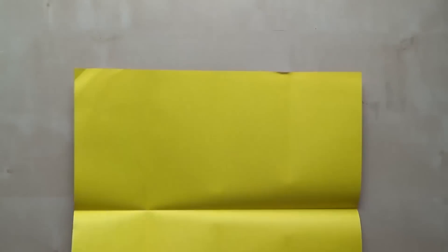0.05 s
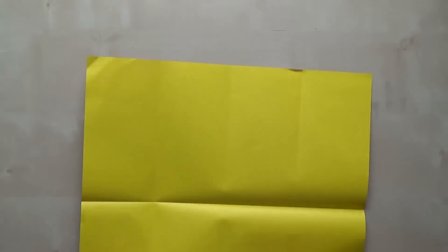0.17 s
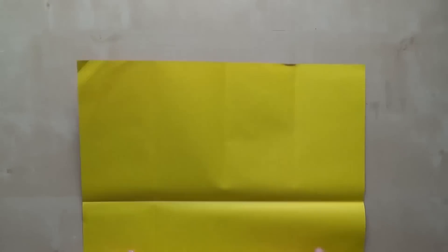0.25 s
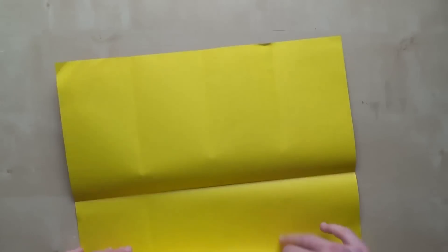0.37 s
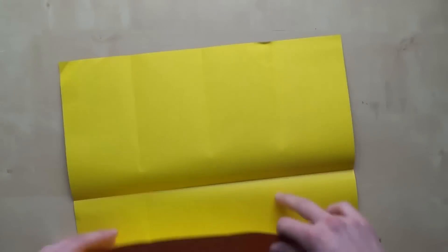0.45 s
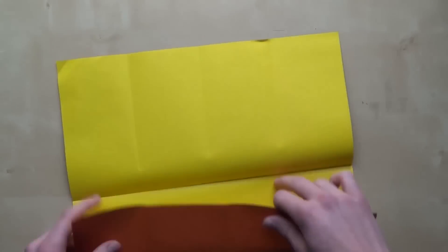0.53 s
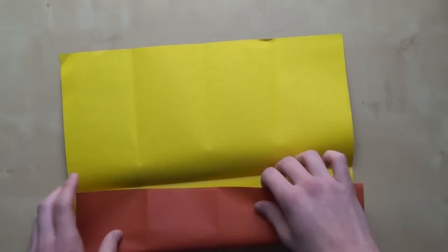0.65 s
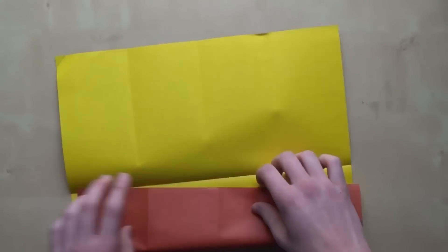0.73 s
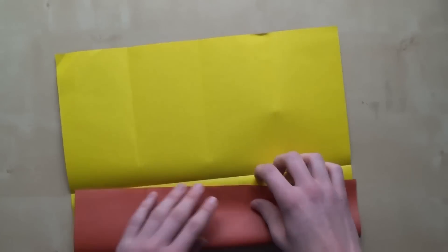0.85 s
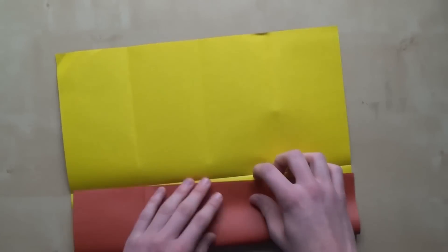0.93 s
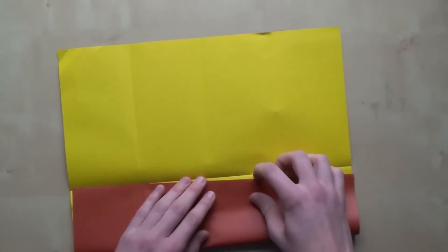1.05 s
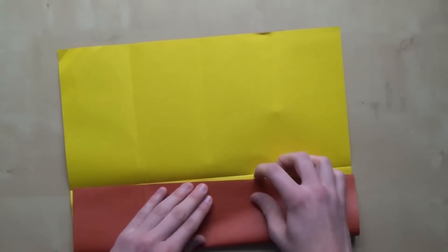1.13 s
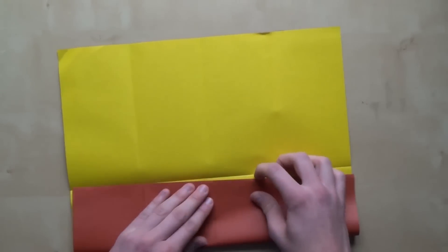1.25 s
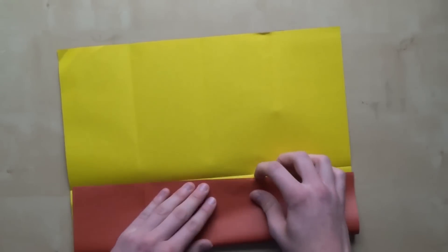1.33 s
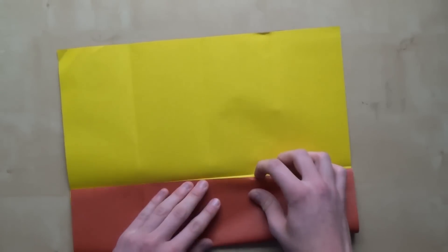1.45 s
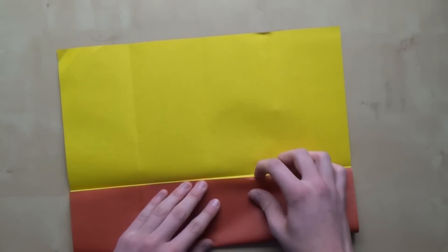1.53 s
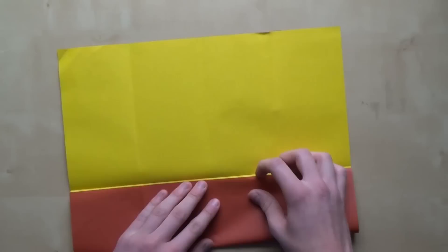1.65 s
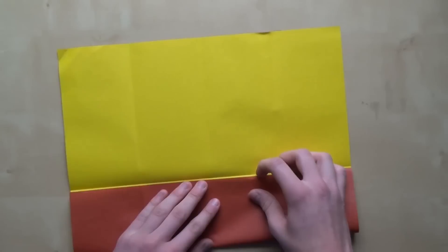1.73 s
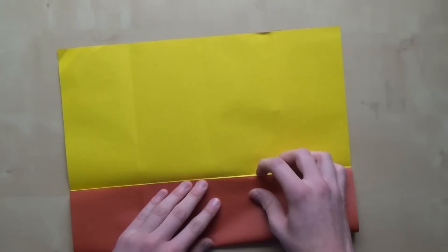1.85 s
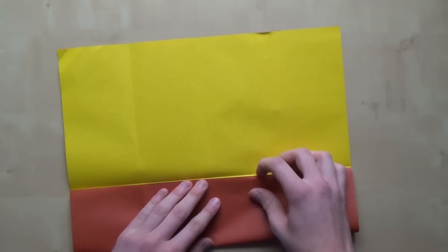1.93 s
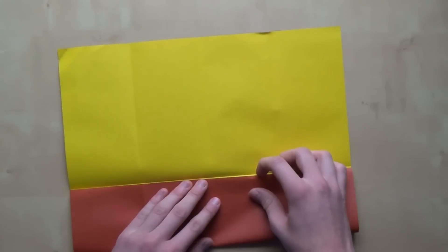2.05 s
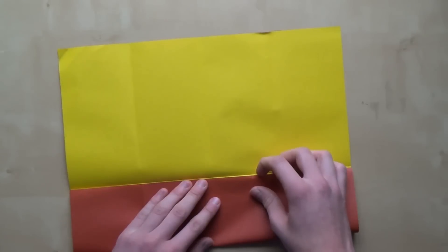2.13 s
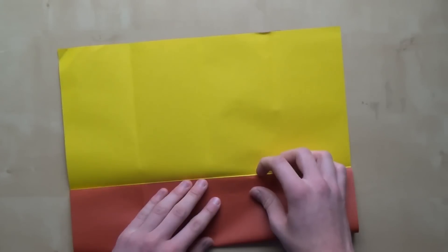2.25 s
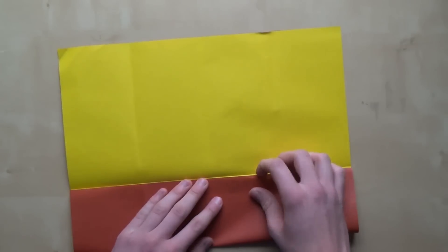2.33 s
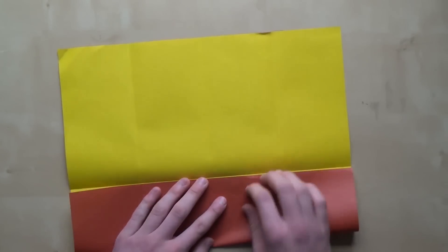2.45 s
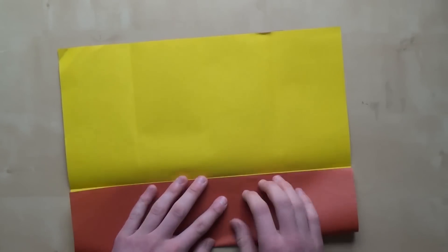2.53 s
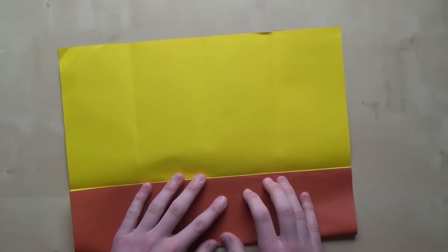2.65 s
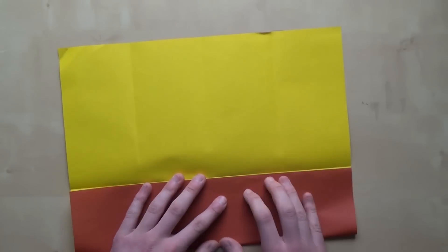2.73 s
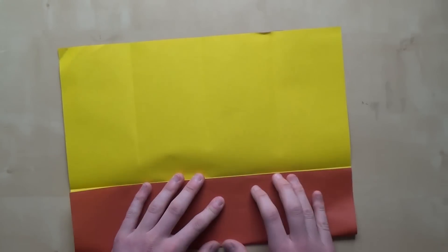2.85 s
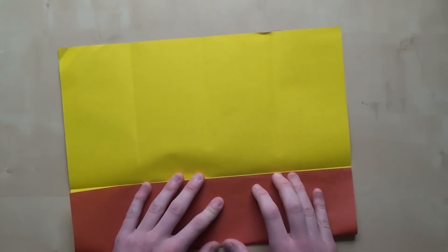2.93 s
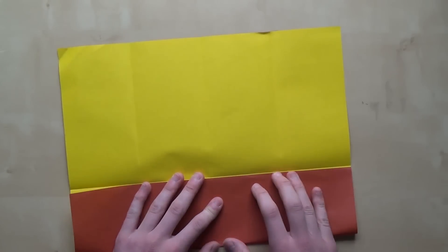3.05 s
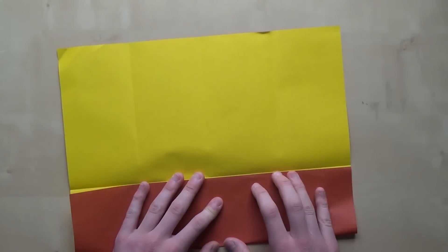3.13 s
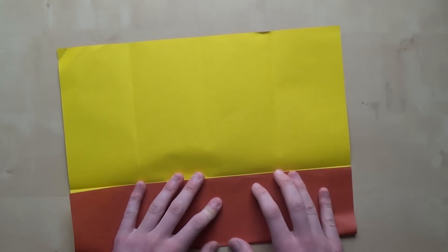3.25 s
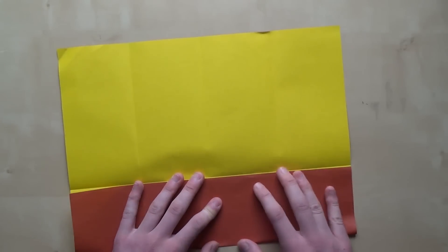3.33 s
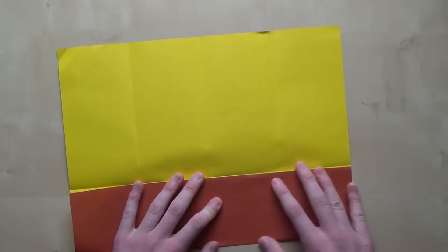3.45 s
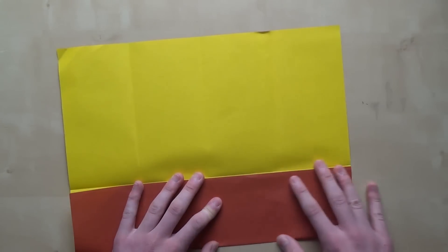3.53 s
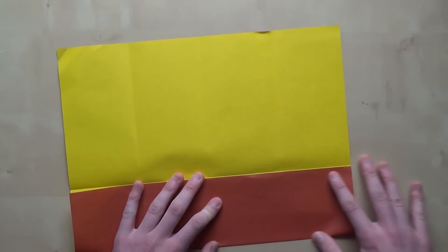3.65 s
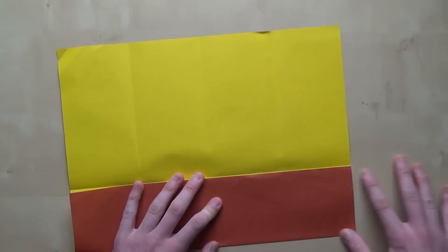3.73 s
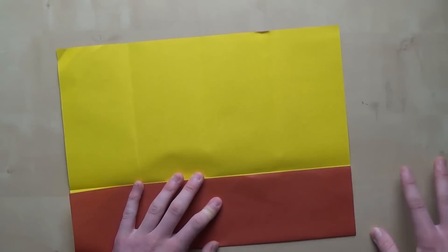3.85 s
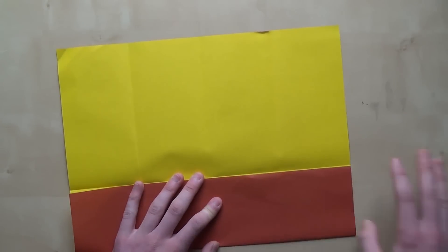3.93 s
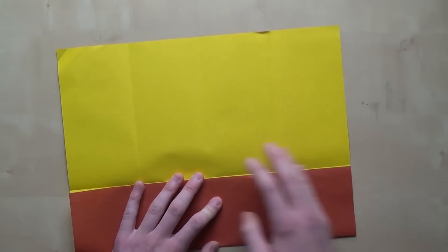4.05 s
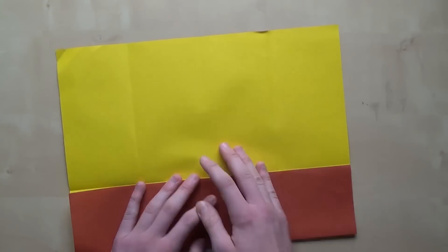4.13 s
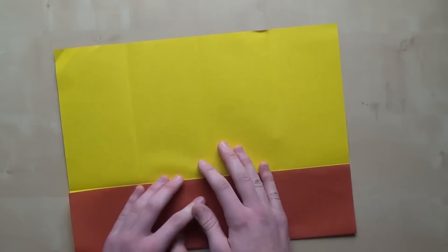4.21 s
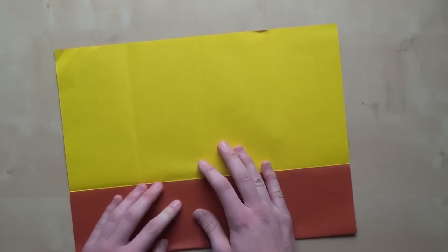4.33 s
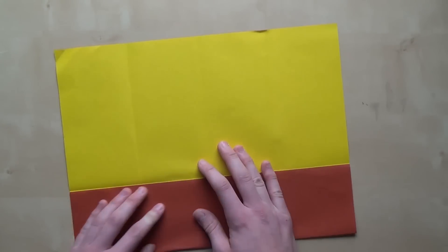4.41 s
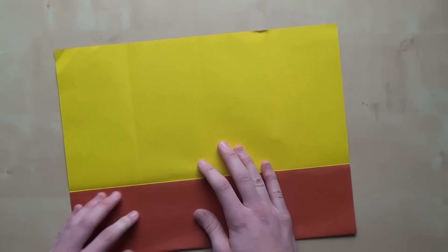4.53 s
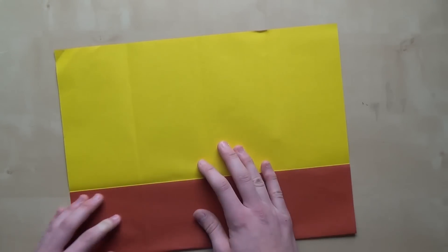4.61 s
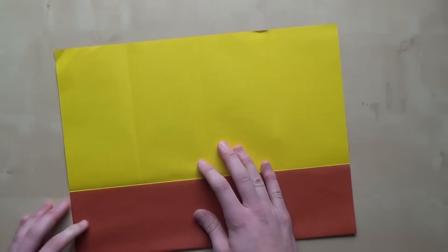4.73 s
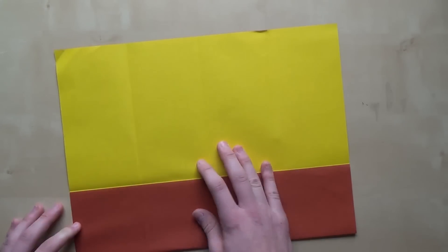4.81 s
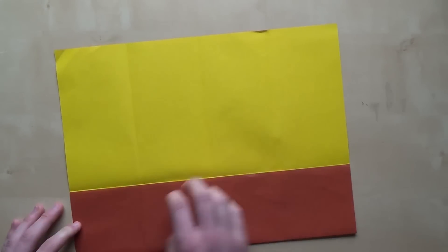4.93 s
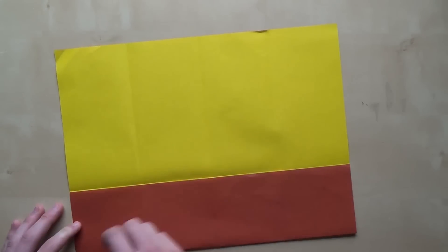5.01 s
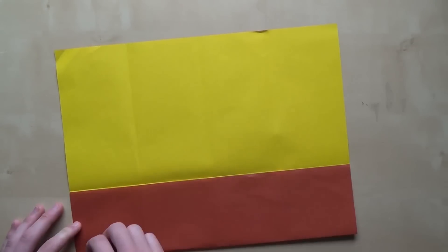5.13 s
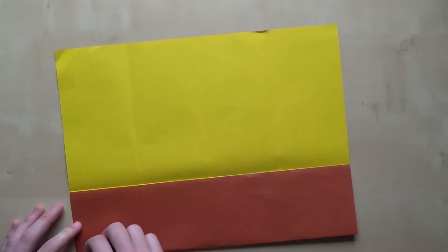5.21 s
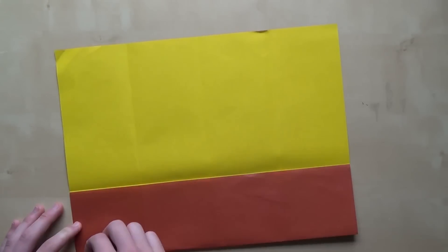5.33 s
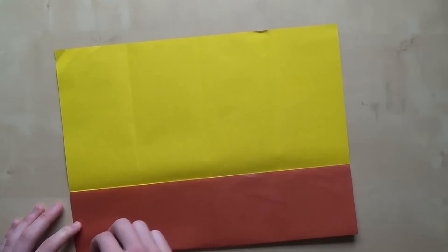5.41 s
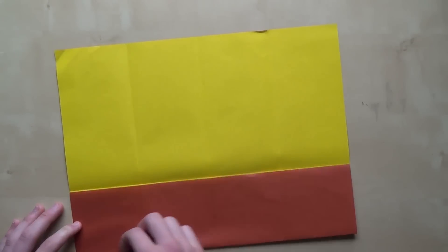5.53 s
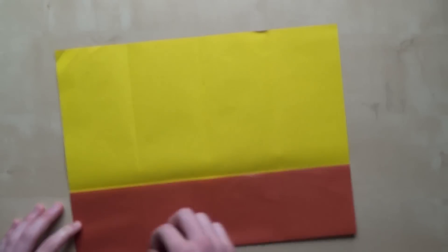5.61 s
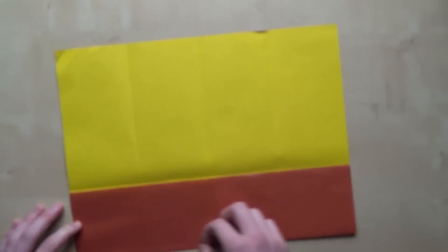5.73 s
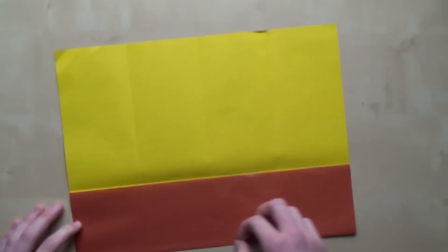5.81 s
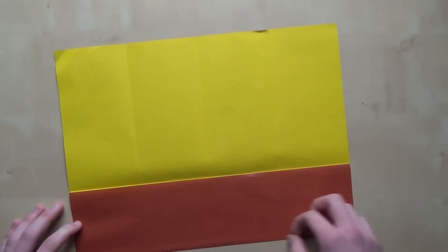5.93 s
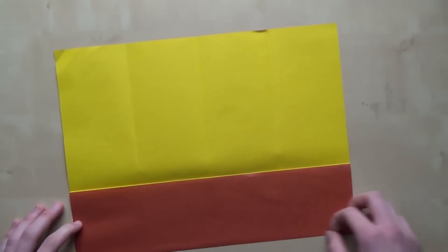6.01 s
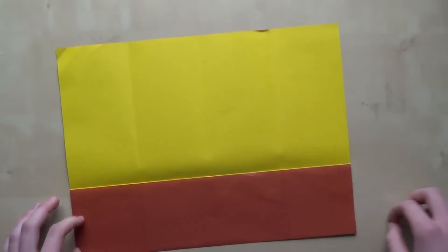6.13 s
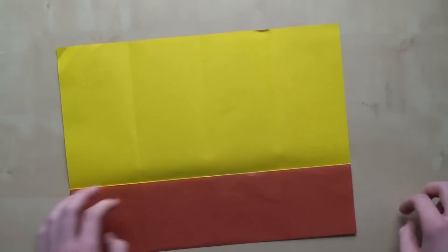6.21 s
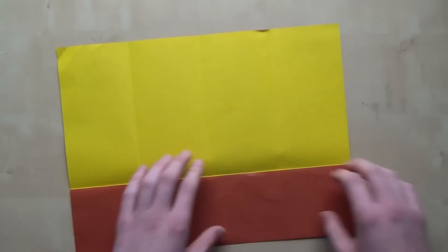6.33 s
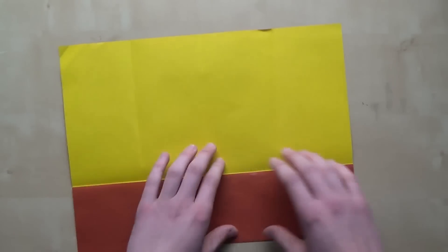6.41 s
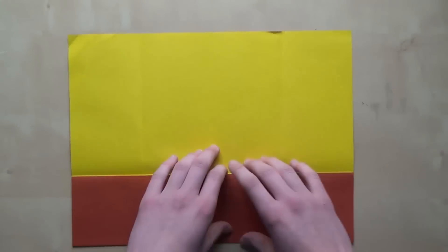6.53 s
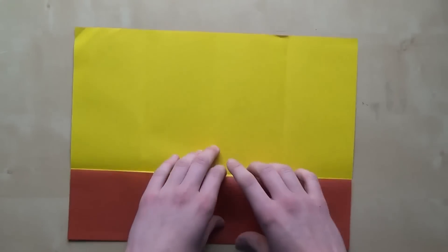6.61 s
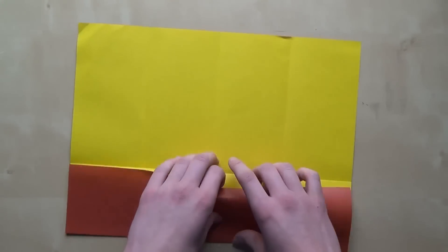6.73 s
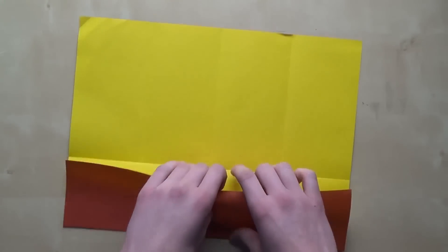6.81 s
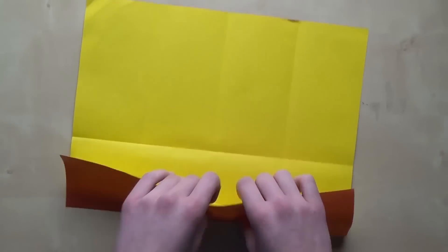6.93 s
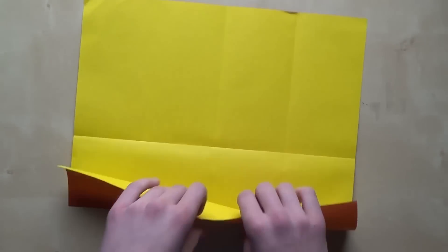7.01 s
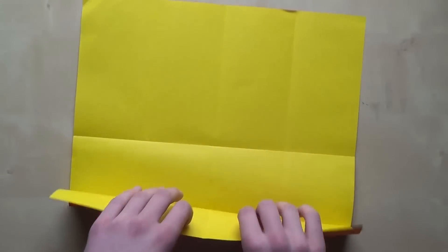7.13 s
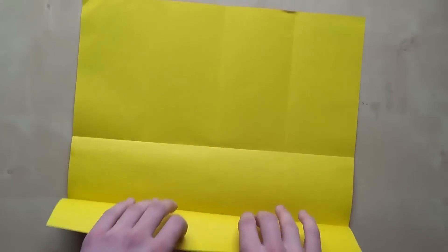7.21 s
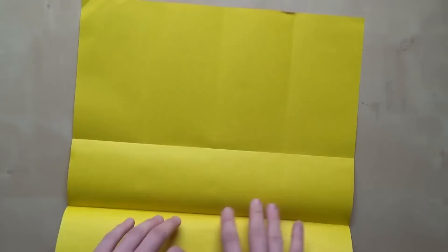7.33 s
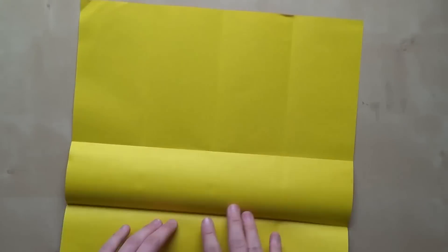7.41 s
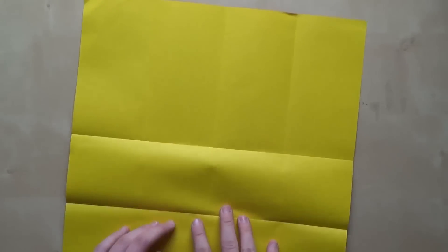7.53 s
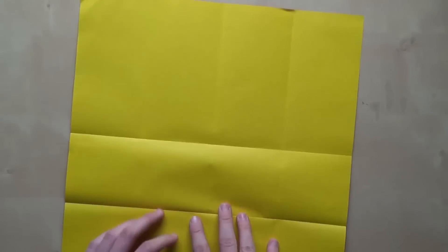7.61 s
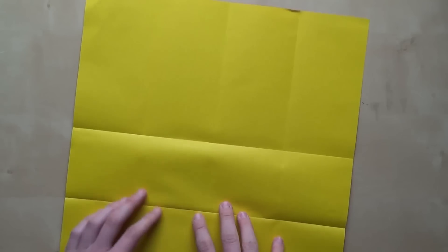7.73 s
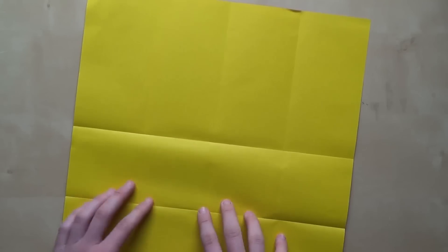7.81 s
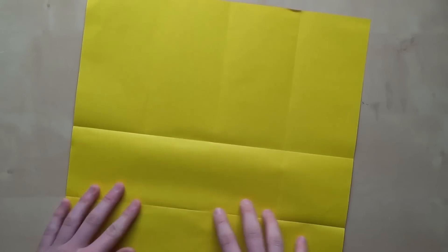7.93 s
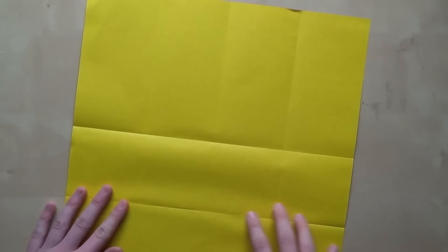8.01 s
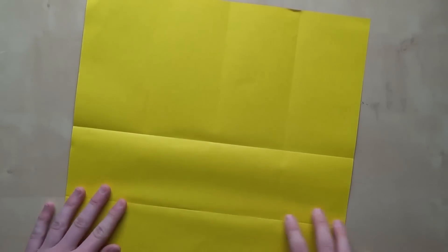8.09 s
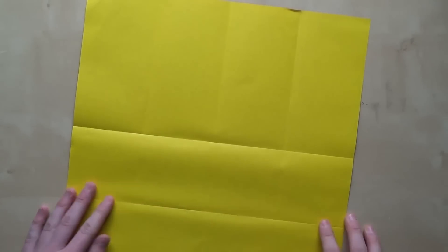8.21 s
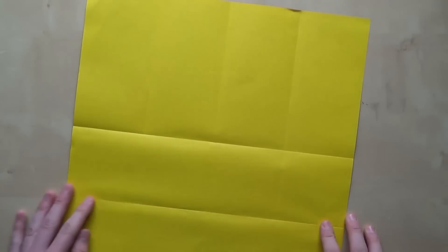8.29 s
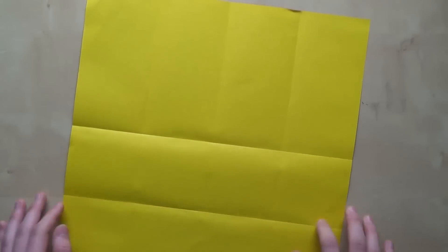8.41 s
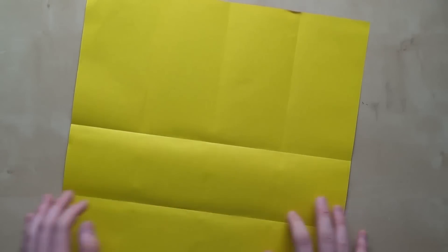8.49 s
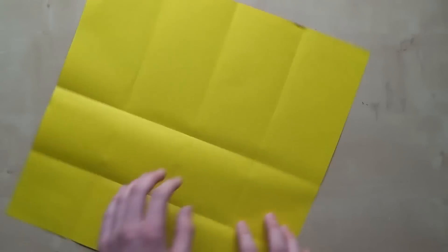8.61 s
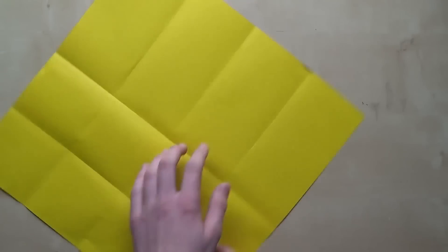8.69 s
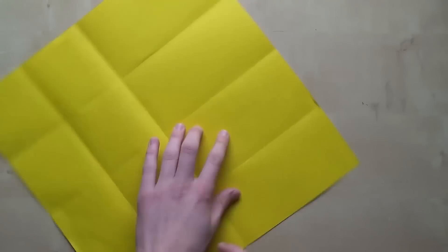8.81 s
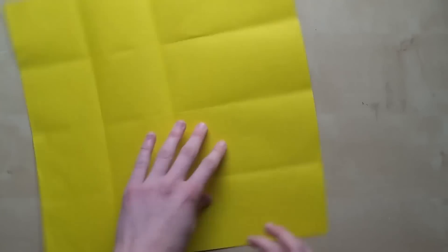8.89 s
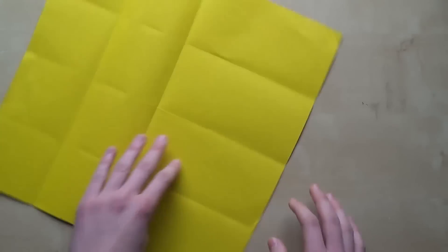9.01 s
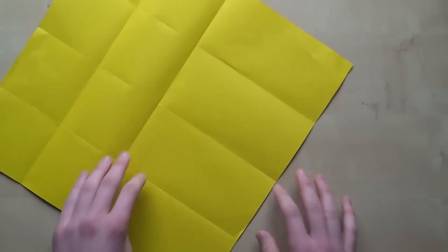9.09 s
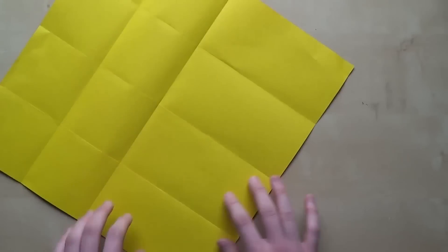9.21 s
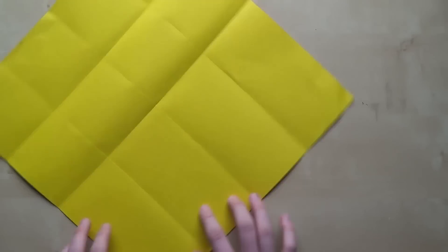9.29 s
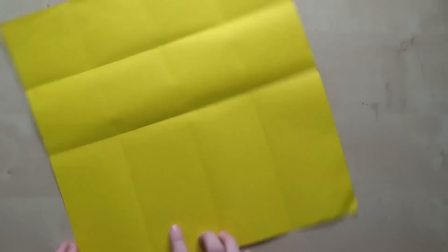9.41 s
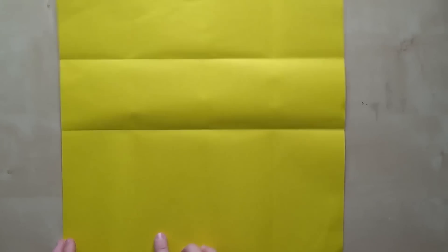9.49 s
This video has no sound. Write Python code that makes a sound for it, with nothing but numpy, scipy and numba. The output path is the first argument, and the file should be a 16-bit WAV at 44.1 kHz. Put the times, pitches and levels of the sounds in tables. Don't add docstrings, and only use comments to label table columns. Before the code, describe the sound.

Loud crumply rustling and dull paper pops come first, thinning to sparse hand rubs on a wooden table. Soft hissing strokes and a lower, woody nail scrape follow, ending in a sharp snap. The sheet crackles while unfolding, is brushed flat, then rustles strongly as it is swung around. Recorded near, with short room echoes, faint hum and slightly dulled treble.

```python
import sys
import numpy as np
from scipy import signal
from scipy.fft import rfft, irfft, next_fast_len
from scipy.io import wavfile
from scipy.ndimage import uniform_filter1d
from numba import njit

SR = 44100
rng = np.random.default_rng(int(sys.argv[2]) if len(sys.argv) > 2 else 0)


def natural_amplitude(level_db):
    exponent = np.asarray(level_db, float) / 20
    return 10 ** exponent


def transcribe(signal):
    frames = np.atleast_2d(signal).T
    limited = np.clip(frames, -1, 1)
    pcm = np.round(limited * 32767).astype(np.int16)
    wavfile.write(sys.argv[1], SR, pcm)


N = 421155
TIME = np.arange(N) / SR


def unit(x):
    return x / np.sqrt(np.mean(x ** 2))


@njit
def resonate(x, hz, width):
    y, band, low = np.empty(len(x)), 0., 0.
    for i in range(len(x)):
        g, damping = np.tan(np.pi * hz[i] / SR), width / hz[i]
        v = (band + g * (x[i] - low)) / (1 + g * (g + damping))
        band, low = 2 * v - band, low + 2 * g * v
        y[i] = damping * v
    return y


def ring(x, hz, width):
    return unit(resonate(x, np.full(len(x), 1. * hz), 1. * width))


def walk(rate):
    hold = int(SR / rate)
    steps = np.repeat(rng.standard_normal(N // hold + 1), hold)
    return 1.84 * uniform_filter1d(uniform_filter1d(steps, hold), hold)[:N]


def colour(x, response):
    hz, db = np.transpose(response)
    size = next_fast_len(len(x))
    bins = np.arange(size // 2 + 1) * SR / size + 1
    gain = natural_amplitude(np.interp(np.log(bins), np.log(hz), db))
    return irfft(rfft(x, size) * gain, size)[:len(x)]


def hum():
    # time in seconds, level in dB
    levels = [(0.0, -59), (1.09, -67), (1.91, -61), (4.71, -53), (5.56, -55.5), (5.95, -63), (6.33, -56),
              (7.34, -64.5), (8.7, -61), (8.9, -54), (9.55, -55)]
    phase = 2 * np.pi * np.cumsum(90.8 + 1.3 * walk(8.8)) / SR
    level_db = np.interp(TIME, *np.transpose(levels)) + 0.28 * walk(13)
    return np.sqrt(2) * natural_amplitude(level_db) * np.sin(phase)


def room_air():
    # frequency in Hz, level in dB
    spectrum = [(20, -14), (50, -5), (75, 3), (120, 3.5), (170, -2.5), (550, -2), (2500, -6.5),
                (11500, -18)]
    return unit(colour(rng.standard_normal(N), spectrum)) * natural_amplitude(-53.5 + 0.87 * walk(6.6))


def hands():
    # peak in seconds, rise in seconds, fall in seconds, peak in dB,
    # slide in dB (+ gliding, - bending)
    lifting = [(.028, 0.33, 0.0052, -34.5, 25), (.043, 0.0018, 0.022, -21, -2),
               (.075, 0.047, 0.095, -29, -13), (.11, 0.054, 0.079, -32.5, -8)]
    pressing = [(4.236, 0.023, 0.1, -38, -1), (4.325, 0.021, 0.097, -41, 5), (4.38, 0.067, 0.073, -54, 17),
                (4.43, 0.2, 0.56, -44.5, 10.5), (4.62, 0.21, 0.36, -50, 6), (4.8, 0.35, 0.14, -54, 15.5),
                (4.87, 0.47, 0.074, -56.5, -20), (5.15, 0.0048, 0.077, -48, 8.5),
                (9.27, 0.089, 0.11, -51, -18)]
    folding = [(.145, 0.0099, 0.29, -27.5, -4), (.242, 0.076, 0.079, -28, 2), (.3, 0.0076, 0.069, -32, -20),
               (.377, .004, 0.062, -21.5, 5), (.397, 0.035, 0.064, -17, 4), (.44, 0.13, 0.034, -19.5, 2),
               (.49, .05, 0.36, -37, 12.5), (.6, 0.34, 0.092, -36, -22), (.64, 0.032, 0.065, -34, 10),
               (.7, .04, 0.24, -26.5, 2.5), (.762, 0.17, 0.1, -28.5, -6), (.845, 0.053, 0.033, -23, 3),
               (.9, 0.066, 0.22, -33, 10.5), (1.0, 0.18, 0.27, -36.5, 4), (1.082, 0.023, 0.061, -29, 1),
               (1.19, 0.13, 0.19, -40.5, 8), (1.36, 0.053, 0.22, -46.5, 3), (1.435, 0.065, 0.12, -39, 8.5),
               (1.49, 0.074, 0.07, -40, -5), (1.575, 0.025, 0.13, -44.5, -3), (1.66, 0.0054, .04, -57, 1),
               (1.69, 0.047, 0.31, -52, 6.5), (1.95, .3, 0.65, -77, 6)]
    creasing = [(2.478, 0.027, 0.27, -42, -1), (2.686, 0.26, 0.13, -40, 2.5), (2.79, 0.012, 0.13, -48, -3),
                (2.9, 0.09, 0.13, -45, 2), (3.08, .2, 0.079, -54.5, -5.5), (3.2, 0.036, 0.15, -50.5, -2.5),
                (3.37, 0.031, 0.62, -46, 0.5), (3.52, 0.12, 0.28, -40.5, 3), (3.61, 0.046, 0.24, -37.5, 4),
                (3.72, 0.14, 0.15, -48.5, 11), (3.775, 0.0035, 0.16, -36.5, 2),
                (3.85, 0.11, 0.13, -51, 7.5), (3.95, 0.21, 0.19, -57.5, -34)]
    nailing = [(5.212, 0.059, 0.044, -52, 9), (5.3, 0.05, 0.34, -63, 5), (5.55, 0.074, 0.26, -54.5, 6),
               (5.63, 0.14, 0.7, -42.5, 5), (5.72, 0.15, 0.55, -38.5, 1.5), (5.84, 0.11, 0.47, -46, 4),
               (5.974, 0.46, 0.22, -37, 1.5), (6.12, 0.41, 0.28, -40.5, 2.5), (6.19, 0.36, 0.018, -39.5, 2),
               (6.215, 0.01, .11, -28.5, 4.5)]
    unfolding = [(6.525, 0.025, 0.089, -42.5, 4), (6.65, 0.12, 0.21, -44.5, 8.5),
                 (6.76, 0.11, 0.17, -46.5, -3), (6.85, 0.14, 0.14, -43, 8.5),
                 (6.89, 0.041, 0.099, -31.5, -7), (7.005, 0.09, 0.11, -27.5, 4.5),
                 (7.03, 0.025, 0.36, -39, -20), (7.195, 0.29, 0.083, -35.5, 0.5),
                 (7.26, 0.11, 0.19, -41.5, -3), (7.31, 0.0057, 0.061, -41, -19), (7.46, 0.023, 0.2, -43, 9),
                 (7.63, 0.15, 0.033, -33, -9), (7.647, 0.0059, 0.12, -29.5, 1),
                 (7.56, 0.043, 0.11, -36.5, -7)]
    smoothing = [(7.79, 0.058, 0.15, -39, 1), (7.845, 0.04, 0.1, -41, -3), (8.074, 0.22, 0.6, -44.5, 7),
                 (8.25, 0.53, 0.17, -43, 9), (8.42, 0.22, 0.18, -53, 12.5), (8.58, 0.42, 0.21, -55.5, -39),
                 (8.542, 0.024, 0.022, -34, 3)]
    turning = [(8.637, 0.0035, 0.13, -32.5, -13), (8.68, 0.047, 0.17, -32, 11.5),
               (8.75, 0.085, 0.091, -26.5, 7.5), (8.812, 0.15, 0.11, -22.5, 3),
               (8.964, 0.067, 0.16, -20, 0), (9.07, 0.17, 0.13, -23.5, 8.5),
               (9.15, 0.12, 0.064, -26.5, 2.5), (9.2, 0.11, 0.062, -37.5, -36),
               (9.347, 0.0037, 0.098, -35, 5), (9.385, 0.029, 0.17, -26, 4), (9.44, .07, 0.17, -24, 2.5),
               (9.52, 0.095, 0.23, -19, 1.5)]
    LIFTING, PRESSING, FOLDING, CREASING = lifting, pressing, folding, creasing
    NAILING, UNFOLDING, SMOOTHING, TURNING = nailing, unfolding, smoothing, turning
    # strokes, hiss, flexing and table in dB against rustle,
    # focus in Hz, grit in dB, roundness of the swell (exponent)
    actions = [
        (LIFTING, -27.5, 2.9, -5.5, 2800, 1.0, 1.5),
        (PRESSING, -.1, -8, -7.5, 3000, .1, 1.11),
        (FOLDING, -8.5, -4, -15, 2550, 0.96, 1.15),
        (CREASING, -0.087, -8.5, -16.5, 3700, .1, 2.22),
        (NAILING, -1.9, 0.34, -4, 3200, 0.7, 1.51),
        (UNFOLDING, -3.5, -5, -12.5, 3300, 1.4, 0.95),
        (SMOOTHING, -.1, -13, -11.5, 3430, 0.086, 1.3),
        (TURNING, -4, -20, -28, 3970, 0.21, 1.43),
    ]
    per_force, per_slide = (1.17, 1.077, 1.02, 0.56), (-0.038, 1, -0.38, -0.3)
    usual_db, span_db = -35, 20
    focus_oct_per_db = 0.0427
    t, power, traits = TIME[::32], 1e-30, 0
    for strokes, hiss_db, flex_db, table_db, focus_hz, grit_db, roundness in actions:
        for s, rise_s, fall_s, db, slide_db in strokes:
            away = np.abs(t - s) / np.maximum(np.where(t < s, rise_s, fall_s), .001)
            force_db = np.maximum(db - usual_db - span_db * away ** roundness, -200)
            mix_db = np.array([0, hiss_db, flex_db, table_db]) + np.multiply(per_slide, slide_db)
            share = natural_amplitude(2 * (usual_db + mix_db[:, None] + np.outer(per_force, force_db)))
            power = power + share
            stroke_hz = focus_hz * 2 ** (focus_oct_per_db * slide_db)
            traits = traits + np.outer([stroke_hz, grit_db], share[0])
    return [np.interp(TIME, t, row) for row in (*np.sqrt(power), *(traits / power[0]))]


def pings(grit_db):
    out = 0
    for hz in 250 * 2 ** np.arange(0, 4.6, .2):
        pops = (rng.random(N) < 120 / SR) * rng.standard_normal(N)
        patch = unit(resonate(pops, hz * (1 + 0.067 * walk(6)), hz / 22))
        out = out + np.sqrt(hz / SR) * patch
    return out * np.clip(grit_db, 0, 3.5)


def slips(grit_db):
    slips_per_s = 9000
    when = rng.random(N) < slips_per_s / SR
    size = natural_amplitude(np.clip(grit_db, 0, 2.5) * np.minimum(rng.exponential(1, N), 4))
    jerks = when * size * rng.standard_normal(N)
    even = jerks / np.sqrt(uniform_filter1d(jerks ** 2, size=SR // 20) + 1e-9)
    return even + 0.16 * pings(grit_db)


def patchy(x):
    depth_db, life_s, width_hz = 2.6, .03, 260
    hz, t, z = signal.stft(x, SR, nperseg=512)
    field = rng.standard_normal(z.shape)
    for _ in range(2):
        field = uniform_filter1d(field, max(int(width_hz / hz[1]), 1), axis=0)
        field = uniform_filter1d(field, max(int(life_s / t[1]), 1), axis=1)
    swell_db = depth_db * unit(field) / (1 + (hz[:, None] / 3000) ** 2)
    return unit(signal.istft(z * natural_amplitude(swell_db), SR, nperseg=512)[1][:N])


def rubbing():
    # frequency in Hz, level in dB
    rustle_response = [(1200, -47), (2000, -7), (2600, 1.5), (3500, 0.5), (5000, -1.5), (6500, -6.5),
                       (9000, -64)]
    hiss_response = [(3500, -22), (5200, -9.5), (6500, -1.5), (8500, -2), (10000, 0), (11100, -0.5),
                     (13000, -9.5)]
    flex_response = [(400, -32), (700, -1.5), (1000, -0.5), (1600, 5.5), (2200, 0), (3200, -19)]
    table_response = [(70, -13), (160, -6.5), (260, 1.5), (420, -0.5), (650, -3), (900, -16), (1500, -75)]
    # frequency in Hz, width in Hz, level in dB
    modes = [(203, 17, -5), (251, 76, 0.5), (324, 8.8, -23), (408, 28, -1.5), (564, 53, 5), (674, 62, 0),
             (784, 8, 5), (980, 240, 8)]
    *gains, focus_hz, grit_db = hands()
    drive = patchy(slips(grit_db) * natural_amplitude(.8 * walk(40)))
    rustle = unit(colour(drive, rustle_response))
    hiss = unit(colour(drive, hiss_response))
    flex = unit(colour(drive, flex_response))
    table = unit(colour(drive, table_response))
    rustle = unit(0.37 * rustle + resonate(rustle, focus_hz, 2500.0))
    wood = sum(natural_amplitude(db) * ring(flex + table, hz, width) for hz, width, db in modes)
    parts = rustle, hiss, flex, unit(table + 0.86 * unit(wood))
    return sum(gain * natural_amplitude(.8 * walk(20)) * part for gain, part in zip(gains, parts))


def room(x):
    t60_s, treble_t60_s = 0.32, 0.34
    t = TIME[:int(.7 * SR)]
    noise = rng.standard_normal(len(t))
    low = uniform_filter1d(noise, size=7)
    tail = low * natural_amplitude(-60 * t / t60_s) + (noise - low) * natural_amplitude(-60 * t / treble_t60_s)
    tail = tail * np.clip((t - .003) / 0.00036, 0, 1)
    return signal.fftconvolve(x, tail / np.sqrt(np.sum(tail ** 2)))[:N]


def snaps(events, treble_db, thin):
    out, t = np.zeros(N + SR), TIME[:SR // 10]
    for s, db, hz, body_db in events:
        noise = rng.standard_normal((3, len(t)))
        click = np.sin(2 * np.pi * hz * t) * t * hz * np.exp(1 - t * hz / .5) / .5
        click = signal.sosfilt(signal.butter(2, thin * hz, "high", fs=SR, output="sos"), click)
        buzz = ring(noise[0], hz, 0.26 * hz) * np.exp(-t / 0.0061)
        tick = unit(np.diff(noise[1], prepend=0)) * np.exp(-t / 0.00093) * (1 - np.exp(-t / 0.00026))
        knock = ring(noise[2], 1400, 380) * np.exp(-t / 0.0037)
        snap = 0.89 * click + 0.18 * buzz + 1.3 * natural_amplitude(treble_db) * tick + 0.44 * natural_amplitude(body_db) * knock
        at = int(s * SR)
        out[at:at + len(t)] += natural_amplitude(db) * snap
    return signal.sosfilt(signal.butter(2, 600, "high", fs=SR, output="sos"), out[:N])


def kinks():
    # start in seconds, peak in dB, ring in Hz, body in dB
    events = [(0.0424, -6, 1540, -17), (0.0624, -2, 2880, -24), (0.3762, -10, 2800, -14),
              (0.0696, -2.5, 1490, -11), (0.0846, -6, 2200, -14), (0.1095, -10, 2400, -12),
              (0.697, -16.5, 1100, -13), (0.842, -16, 3900, -4), (0.2965, -10, 2470, -14),
              (0.3517, -7, 4200, -16), (0.8954, -2.5, 2020, -35), (1.0824, -8.5, 3380, -7.5),
              (1.29, -34, 1490, -10), (1.5724, -15, 2980, -11.5), (1.66, -13.5, 3000, -12.5),
              (2.0448, -30, 1340, -8), (2.7902, -12.5, 2770, -4), (5.2138, -16.5, 2940, -33),
              (6.2123, -5.5, 4930, -38), (7.141, -26, 2003, -12), (7.149, -22, 1890, -14),
              (7.434, -33, 2780, -14), (7.306, -19.5, 3270, -11), (7.643, -20, 2700, -14),
              (7.6495, -4.5, 2720, -15), (8.1213, -17.5, 4180, -34)]
    return snaps(events, -36, 0.38)


def glides(events, share, peak_at, fade):
    out = np.zeros(N + SR)
    for s, length_s, from_hz, to_hz, db in events:
        noise = rng.standard_normal(SR // 2)
        x = np.minimum(TIME[:SR // 2] / length_s, 1)
        hz = from_hz + (to_hz - from_hz) * x
        width = share * (from_hz + to_hz) / 2
        fall = (1 - np.clip((x - peak_at) / (1 - peak_at), 0, 1)) ** fade
        swell = np.minimum(x / peak_at, 1) * fall
        at = int(s * SR)
        out[at:at + len(x)] += natural_amplitude(db) * swell * unit(resonate(resonate(noise, hz, width), hz, width))
    return out[:N]


def air_pockets():
    # start in seconds, length in seconds, first Hz, last Hz, level in dB
    events = [(4.312, 0.19, 3600, 7400, -41), (4.74, .14, 10300, 10800, -49), (.5, 0.17, 340, 320, -46),
              (5.21, 0.088, 550, 500, -38), (4.45, 0.47, 7700, 10000, -47), (5.58, .3, 3400, 3200, -41),
              (5.86, .3, 3300, 3200, -46), (5.53, .25, 830, 1260, -41.5), (5.8, 0.38, 1000, 1250, -40),
              (0.051, 0.11, 570, 540, -22.5), (.385, .065, 3000, 3200, -21), (6.96, 0.11, 4800, 4200, -35),
              (3.45, 0.38, 4000, 5900, -51), (7.8, 0.18, 3500, 4600, -32), (8.06, .28, 10300, 8200, -50),
              (7.66, .26, 2600, 4200, -44)]
    return glides(events, 0.37, .15, 0.96)


def thumps():
    # start in seconds, peak in dB, frequency in Hz, T60 in seconds, sway in dB
    landings = [(0.077, -30, 560, 0.18, -13), (2.603, -42, 118, 1, 0.5), (3.357, -40, 100, 0.27, -11),
                (4.228, -38.5, 108, 0.52, -15), (5.205, -28, 290, 0.61, -15), (6.515, -46.5, 105, 0.21, -2),
                (7.009, -37, 480, 0.25, -8), (7.602, -28, 269, 0.27, -2.5), (8.645, -31, 102, 0.55, -9),
                (8.927, -37.5, 61.3, 0.33, -9), (9.353, -40, 105.6, 0.33, -9)]
    out, t = np.zeros(N + SR), TIME[:SR // 2]
    for s, db, hz, t60, sway_db in landings:
        noise = rng.standard_normal((2, len(t)))
        fade = np.exp(-np.log(1000) * t / max(t60, .03)) * (1 - np.exp(-t / 0.0024))
        rumble = ring(noise[0], hz, 0.32 * hz)
        knock = np.sin(2 * np.pi * hz * t) * np.exp(-t / 0.028)
        sway = ring(ring(noise[1], 95, 120), 95, 120)
        at = int(s * SR)
        out[at:at + len(t)] += natural_amplitude(db) * fade * (0.7 * rumble + 0.59 * knock + 0.66 * natural_amplitude(sway_db) * sway)
    return out[:N]


def cracks():
    # start in seconds, peak in dB, ring in Hz, body in dB
    events = [(0.5761, -16, 5000, -26), (0.7588, -12, 2780, -2), (2.2255, -29.5, 6600, -15),
              (2.4253, -39, 1770, -1), (2.467, -32, 1650, -19), (2.6392, -27.5, 2400, -1),
              (3.1596, -21.5, 8900, -30), (3.7673, -4, 3900, -42), (4.2168, -35, 2760, -20),
              (4.2313, -24, 3240, -28), (4.2522, -14.5, 3970, -13), (4.9572, -30, 4740, -30),
              (5.1452, -30, 4680, -36), (5.1951, -31, 2890, -22), (6.0672, -17.5, 2900, -0.5),
              (6.502, -23.5, 3360, -38), (6.8828, -9.5, 5300, -29), (7.0054, -18, 4300, -23),
              (7.009, -8.5, 3300, -6), (7.0125, -11, 1920, 0), (7.1738, -13, 2500, -11),
              (8.6393, -17, 3630, -9), (8.6626, -10, 3600, -33), (9.346, -42, 4640, -31)]
    return snaps(events, -5, 0.67)


def scuffs():
    # start in seconds, peak in dB, frequency in Hz
    drags = [(0.635, -14, 2300), (0.6824, -17, 1700), (0.7443, -11.5, 2430), (0.8334, -16, 1610),
             (0.877, -12.5, 2000), (1.4312, -25, 2550), (6.529, -23.5, 4750), (6.594, -28, 4600),
             (6.905, -17.5, 2340), (7.0598, -14, 4260), (7.467, -23.5, 2100), (7.489, -20.5, 2730),
             (7.526, -13.5, 1780), (7.5808, -14.5, 2170), (8.535, -27, 3510), (9.3572, -18, 4720)]
    out, t = np.zeros(N + SR), TIME[:SR // 5]
    x = t / 0.011
    for s, db, hz in drags:
        band = ring(rng.standard_normal(len(t)), hz, 0.52 * hz)
        at = int(s * SR)
        out[at:at + len(t)] += natural_amplitude(db) * 0.5 * band * x * np.exp(1 - 2 * x)
    return out[:N]


def shivers():
    # start in seconds, length in seconds, first Hz, last Hz, level in dB
    events = [(2.791, 0.069, 1600, 1450, -35), (2.791, 0.066, 2850, 2400, -38), (3.77, .1, 3300, 3500, -32),
              (7.008, 0.044, 3700, 2500, -26), (7.01, 0.069, 1130, 1100, -27),
              (1.661, 0.06, 1600, 1400, -44), (1.7, .05, 1600, 1500, -46), (6.9, 0.086, 640, 580, -42),
              (6.214, .08, 4800, 4200, -34), (7.01, .06, 730, 630, -32), (7.525, .05, 840, 800, -38)]
    return glides(events, 0.45, .03, 2.5)


def singing_spans():
    # start in seconds, length in seconds, first Hz, last Hz, level in dB
    events = [(4.56, 0.18, 406, 395, -50.5), (4.57, 0.082, 635, 600, -51), (4.78, 0.091, 840, 990, -52),
              (4.88, .06, 400, 400, -53), (5.85, 0.12, 960, 950, -35), (5.96, .07, 1000, 1000, -47),
              (5.69, .07, 620, 616, -47), (5.88, .07, 250, 255, -45), (6.09, 0.065, 1370, 1250, -48),
              (5.81, .06, 4650, 4700, -53), (5.92, .05, 4700, 4600, -50), (6.95, 0.045, 2550, 2600, -38)]
    return glides(events, 0.079, 0.33, 1.2)


def scene():
    # frequency in Hz, side minus mid in dB
    port_difference = [(40, -3), (100, -5), (200, -13), (400, -14), (700, -18), (1300, -29), (2000, -47.5)]
    rub = rubbing() + air_pockets() + shivers() + singing_spans()
    snap = kinks() + cracks() + scuffs()
    near = natural_amplitude(-2.0) * rub + snap + thumps()
    echoes = natural_amplitude(-7.5) * room(natural_amplitude(-3.5) * rub + snap)
    mid = near + echoes + hum() + room_air()
    side = colour(mid + 1.6 * room_air() + natural_amplitude(-12.0) * room(near), port_difference)
    return np.array([mid + side, mid - side])


def top_cut(x):
    return signal.sosfilt(signal.butter(12, 12530, fs=SR, output="sos"), x)


def record(dry):
    low_pass = signal.ellip(10, .3, 60, 11250, fs=SR, output="sos")
    rounded = 0.72 * np.tanh(dry / 0.88)
    return top_cut(signal.sosfilt(low_pass, rounded))


dry = scene()
out = record(dry)
transcribe(out)
```